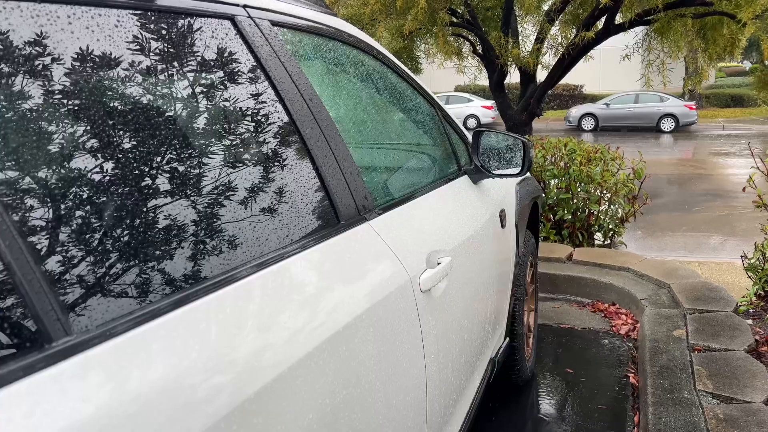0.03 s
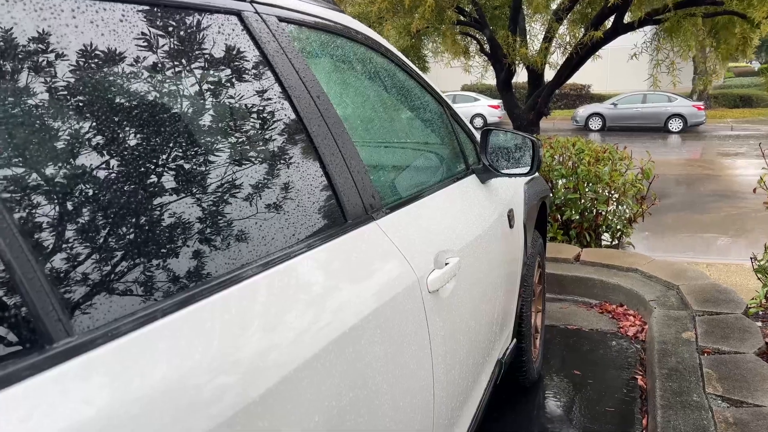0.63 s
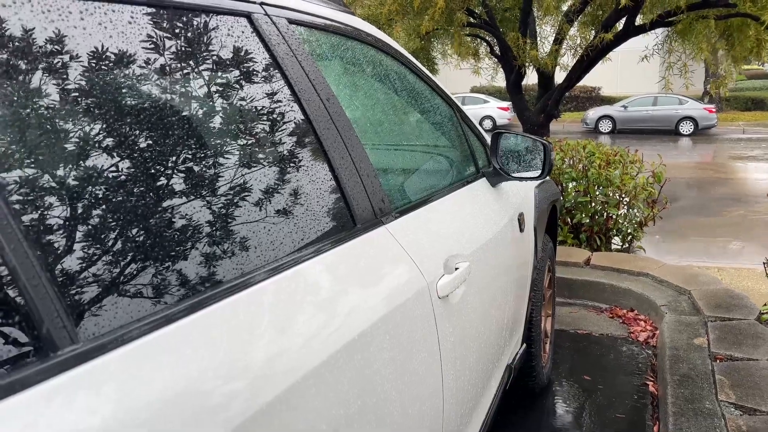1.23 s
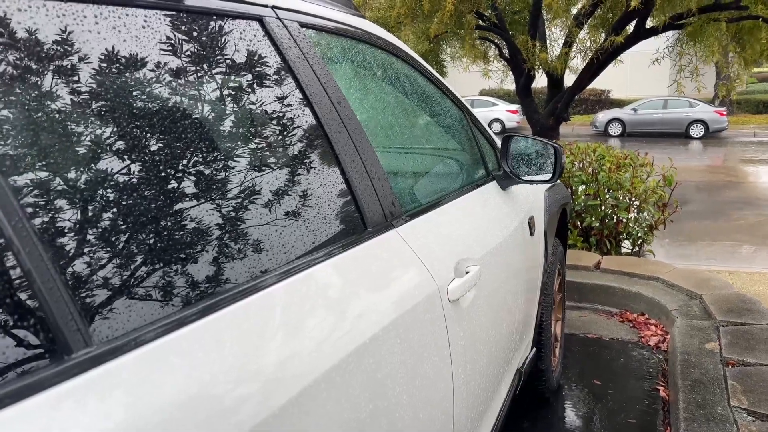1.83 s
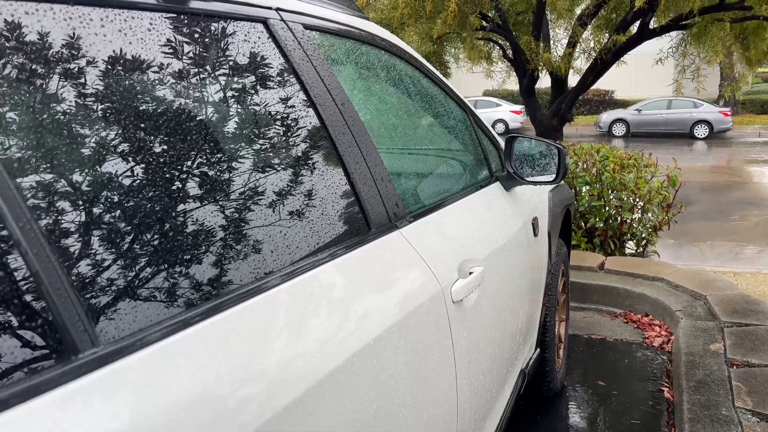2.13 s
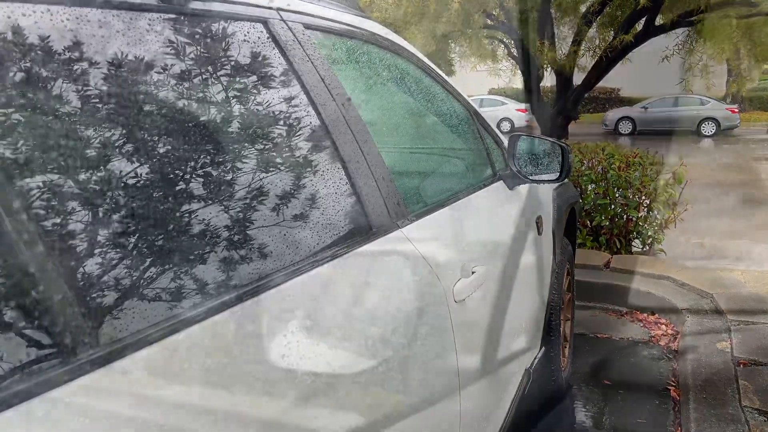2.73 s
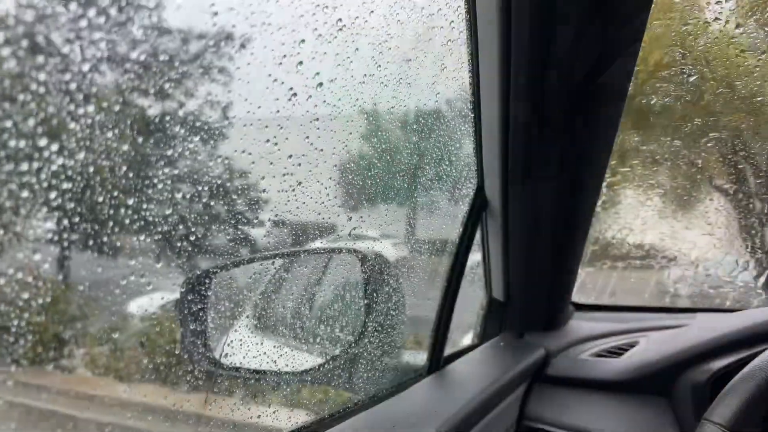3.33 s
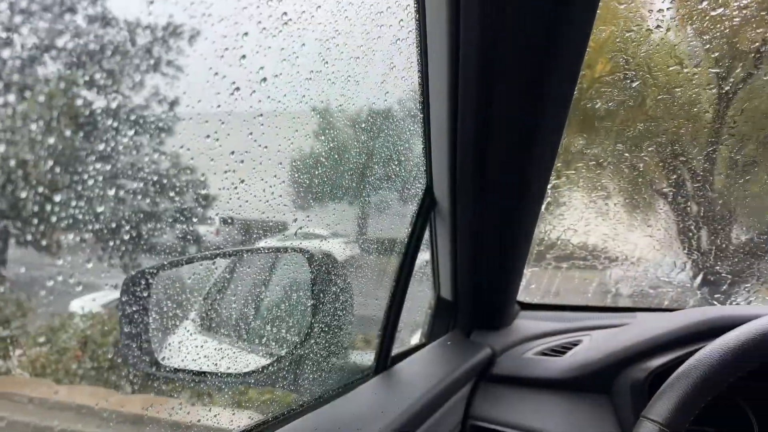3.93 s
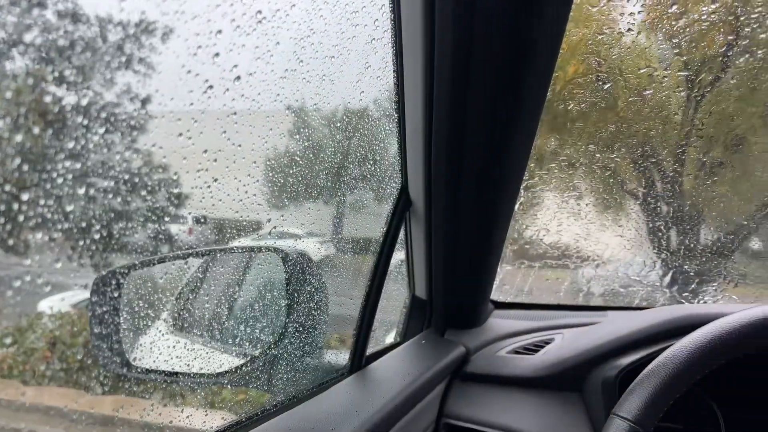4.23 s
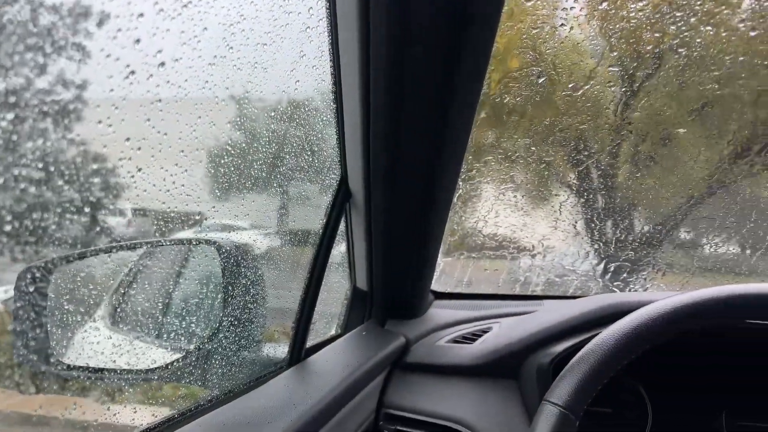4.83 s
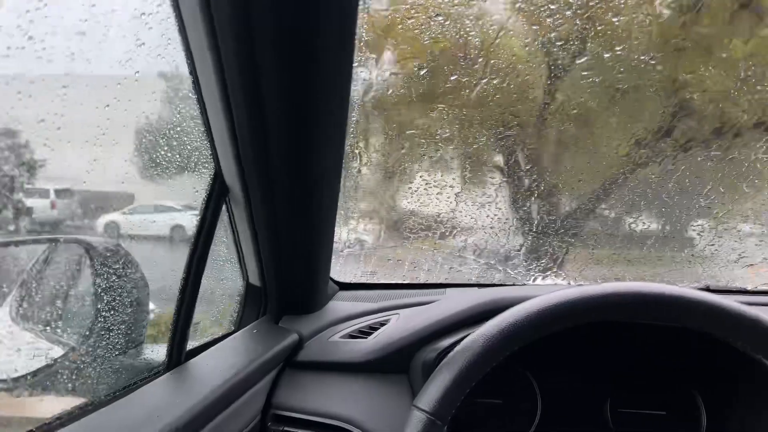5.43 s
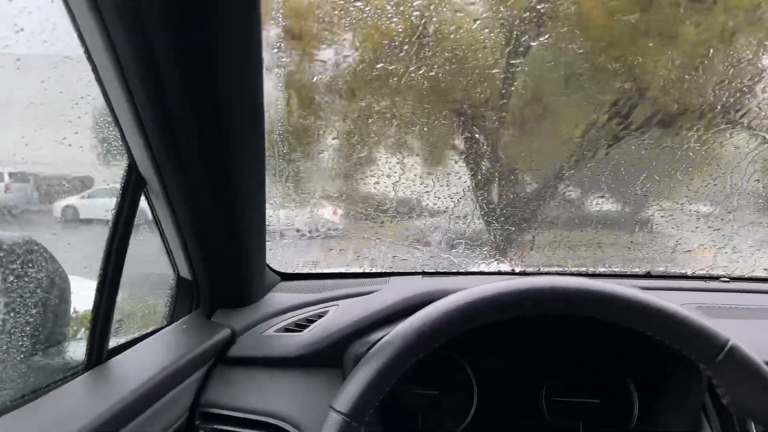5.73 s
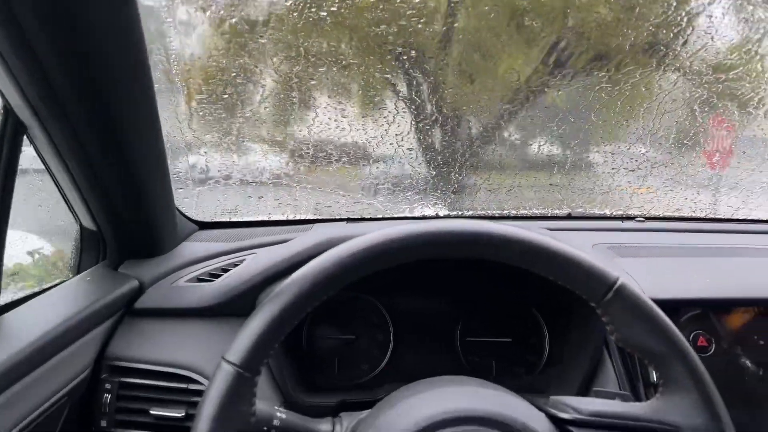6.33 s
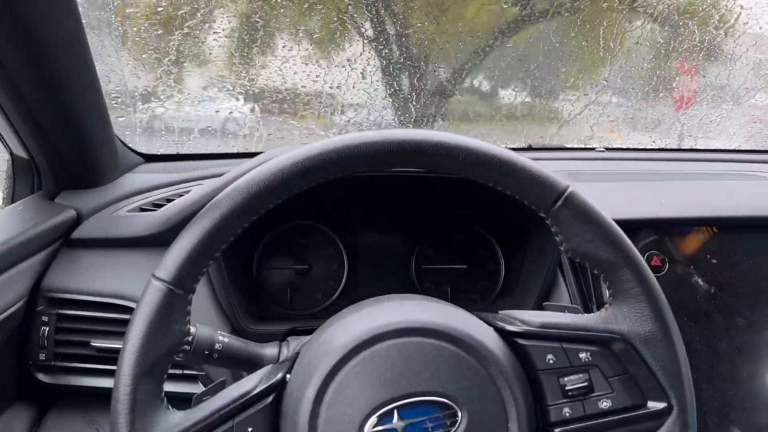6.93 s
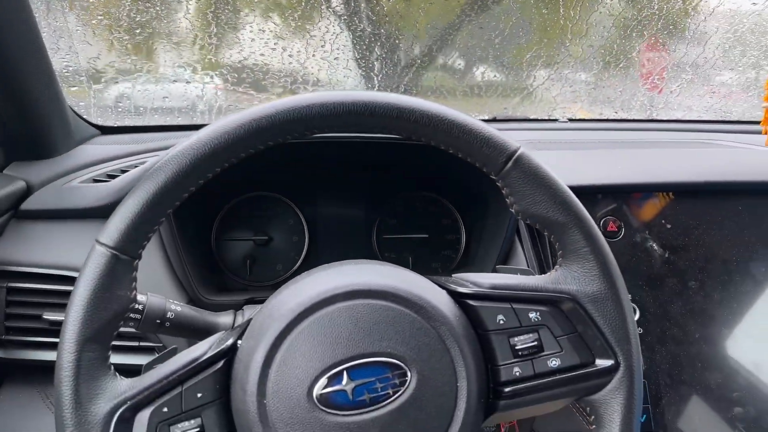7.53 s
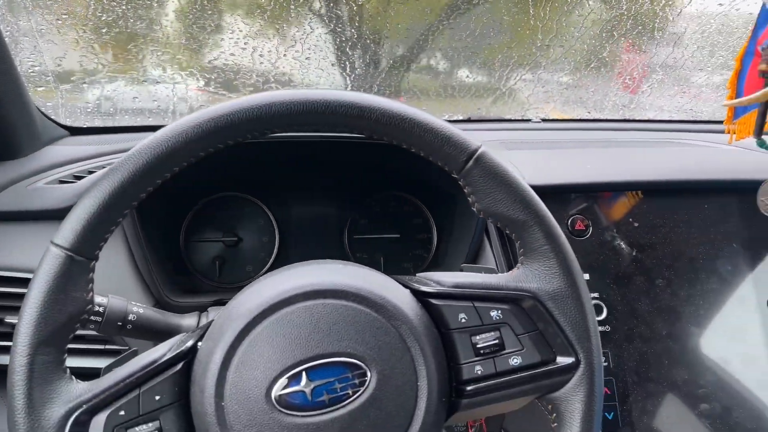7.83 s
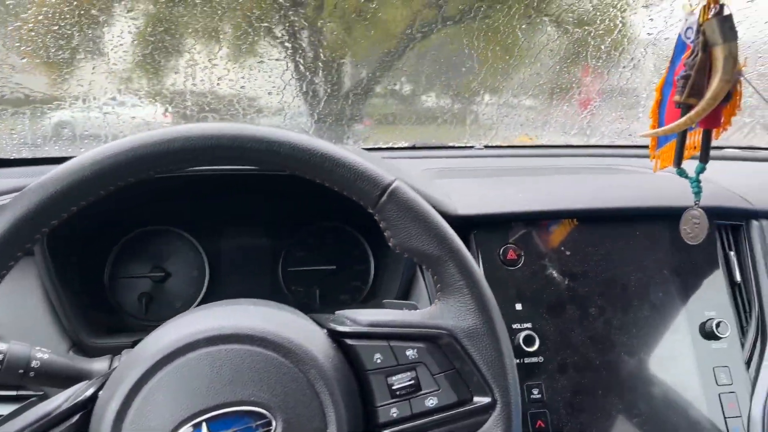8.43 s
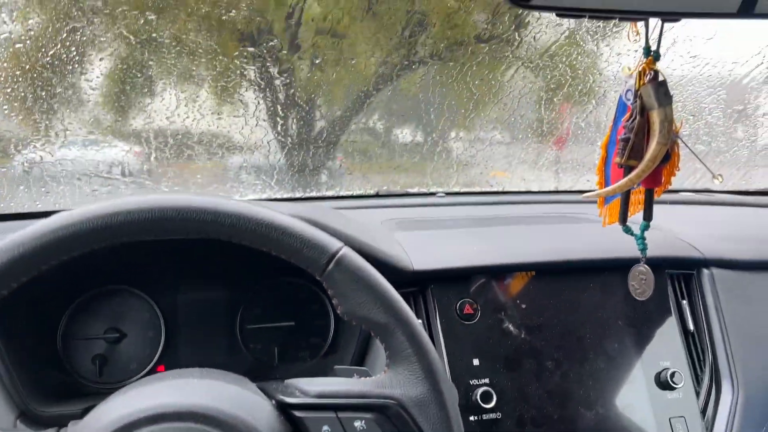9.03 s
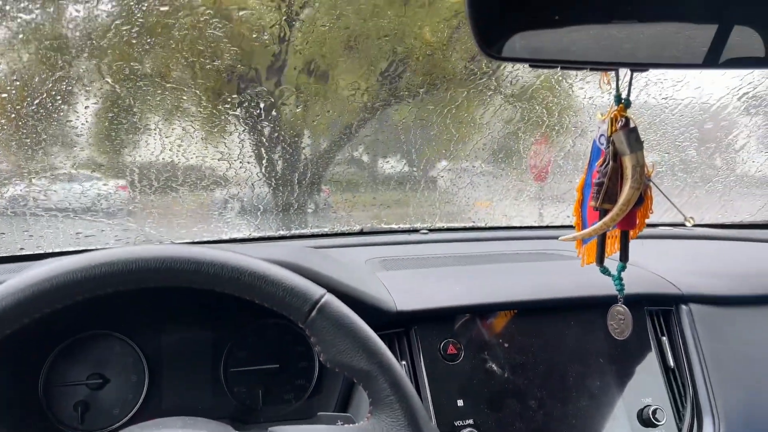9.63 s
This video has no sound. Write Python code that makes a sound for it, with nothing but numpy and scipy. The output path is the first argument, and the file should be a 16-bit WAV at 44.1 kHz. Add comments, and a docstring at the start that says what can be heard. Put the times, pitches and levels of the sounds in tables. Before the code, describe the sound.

Steady rain falls on wet pavement and leaves beside a parked car, an even wash with a few sharp drips close by and low thumps of wind on the microphone. After about three seconds the sound fades across to the inside of the closed car. There the rain is quieter and muffled: dull drumming on the roof, fine patter and sizzle on the glass, and scattered hollow taps of fat drops on the windscreen.

```python
"""Steady rain on a parked car, heard first from beside it, then, after a cross-fade, from the driver's seat.
Each impact excites the body: the roof drums, the glass patters and fat drops ring the windscreen's modes.
Gusts blow sizzling spray on the side window, and the microphone turns from there to the windscreen.
Outside, splashes on wet asphalt and leaves merge into a wash, bubbles ring in puddles and eddies
buffet the microphone. Hard drops tick close by, mostly in the open air."""
import sys
import numpy as np
from scipy import signal
from scipy.fft import rfft, irfft, next_fast_len
from scipy.io import wavfile

SR = 44100
rng = np.random.default_rng(int(sys.argv[2]) if len(sys.argv) > 2 else 0)


def to_wav(s):
    """Save 16-bit WAV."""
    ch = np.atleast_2d(s).T  # columns
    pcm = np.round(np.clip(ch, -1, 1) * 32767)  # PCM
    wavfile.write(sys.argv[1], SR, pcm.astype(np.int16))


N = 427329
TIME = np.arange(N) / SR
FFT_SIZE = next_fast_len(N)
BIN_HZ = np.maximum(np.arange(FFT_SIZE // 2 + 1) * SR / FFT_SIZE, 1)

# Stereo spectra. Each row: frequency in Hz, relative spectral density in dB,
# left-right likeness (1 is in phase, 0 unrelated), left minus right in dB.
WIND_SPECTRUM = [(15, -51, .8, -2), (28.3, -36, .8, 0), (44, -1.5, 0.97, -2), (86.5, 4, 0.91, 2),
                 (144, -6.5, 0.98, 4), (206, -10.5, 0.9, -3.5), (368, -18, 1, 3), (656, -85, 0.55, -5)]   # turbulence at the microphone
WASH_SPECTRUM = [(50, -42, 0.8, -1), (122, 2.5, 1.0, -2), (222, -1.5, 0.58, 7), (333, -1, 0.85, -4.5),
                 (590, -3.0, 0.45, 3.0), (745, -5.0, -0.19, 0), (1100, -7.0, 0.24, 2.5),
                 (1420, -9.0, -0.42, 0.5), (2000, -11.5, 0.00025, -1), (2050, -11, 0.53, 0),
                 (2960, -15.5, 0.37, -2), (4870, -21, 0.17, 5.5), (5630, -20.5, 0.19, 5.5),
                 (7400, -22.5, 0.26, 1), (8970, -21.5, 0.57, 0), (10330, -32.5, -2.47, -2),
                 (11400, -25, 0.74, 0.5), (13400, -43.5, -0.14, -2), (15600, -32.5, 0.09, 1)]   # rain in the open
SPRAY_SPECTRUM = [(1500, -18, 0, 0), (2700, -4, 0, 1), (3500, -1.3, .1, 1.3), (4400, -2.5, .2, 2),
                  (5400, -1.6, -.1, 6.8), (6500, .5, 0, 7.4), (7500, -3.3, .1, 3.5), (8700, -8.5, .2, -.5),
                  (10000, -20, 0, 0), (11600, -20.5, .4, 0), (13200, -33, .3, 0), (15800, -35, .3, 0)]   # fine spray on glass
BOOM_SPECTRUM = [(15, -42, 1, 7), (25, -20, 0.83, -4), (47.3, 5.5, 1, 1), (73.6, -1, 0.99, -0.5),
                 (148, 0, 0.97, 3), (184, -6, 1, 4), (302, -64, 0.11, -2)]   # the heavy body, from the seat
SIDE_SPECTRUM = [(115, -9.5, 0.99, -3), (202, 2.3, 0.88, 2.5), (296, -4.5, 0.55, 7.5), (352, 0, 0.73, 8.5),
                 (416, -2.5, 0.096, -1), (487, -5.5, -0.81, 7.5), (605, -10.5, -0.19, -2),
                 (696, -10, 0.27, -9.5), (870, -8, 1, 4), (1050, -6.5, 0.027, -2.5), (1300, -7, 0.0028, 5),
                 (1510, -6.5, -0.38, -2), (2000, -11, -0.13, 2), (2360, -13, 0.049, -1), (2520, -15, 0, -1),
                 (3060, -17, -0.1, 2), (4500, -22.5, 0.13, 0), (12000, -64, 0, 0)]   # the panels, facing the side window
FRONT_SPECTRUM = [(121, -17, 0.73, 6), (205, 0, 0.63, -0.5), (298, -2, 0.51, 0), (472, -4, 0.62, -2.5),
                  (553, -8, 0.28, -0.5), (725, -6.5, -0.058, 0), (1040, -7.5, 0.29, 0.5),
                  (1360, -6.5, 0.17, 1), (1520, -8, -0.18, -0.5), (2030, -10.5, -0.3, 1.5),
                  (2150, -12.5, 0.02, -2), (2880, -19.0, -0.23, 2.0), (4730, -28, 0.26, -1),
                  (12000, -78, 0, 0)]   # the panels, facing the windscreen

# Slow changes of strength. Each row: time in seconds, level in dB before offsets and the cross-fade.
BREEZE_LEVEL = [(0.0, -37), (0.9, -38), (1.42, -45), (1.6, -39), (2.3, -40), (2.8, -41), (3.3, -34.5)]   # wind on the microphone
GUST_LEVEL = [(3.3, -73.5), (3.85, -65.5), (4.05, -65.5), (4.38, -71.5), (4.92, -71), (5.04, -67),
              (5.61, -64.5), (5.73, -67.5), (6.28, -69.5), (6.42, -73), (6.62, -71), (6.81, -69),
              (7.38, -69), (7.77, -71.5), (8.19, -66.5), (9.12, -65), (9.39, -71.5), (9.69, -69.5)]   # spray blown against the glass
RAIN_LEVEL = [(3.3, -58.5), (3.8, -56), (3.93, -53.5), (4.06, -54.5), (4.2, -57.5), (5.46, -57.5),
              (5.97, -62.5), (6.51, -61.5), (6.81, -56.5), (7.53, -57.5), (7.68, -61), (8.31, -60),
              (9.15, -56.5), (9.69, -58.5)]   # how hard it rains on the car
ROOF_LEVEL = [(3.3, -62), (4.0, -57), (4.25, -60.5), (5.2, -60.5), (5.9, -66), (6.4, -66), (6.9, -63.5),
              (7.5, -62.5), (7.75, -67), (8.3, -66.5), (8.8, -62), (9.35, -59.5), (9.69, -60)]   # how hard the roof drums

# The passage from open air to cabin. Each row: time in seconds, outside gain, cabin gain.
CROSS_FADE = [(0, 0.94, 0.7), (2.45, 0.89, 0.25), (2.85, 0.46, 0.06), (3.35, 0.04, 0.95), (9.7, 0.03, 0.96)]
# Where the microphone faces. Each row: time in seconds, turn from 0 (side window) to 1 (windscreen).
FACING = [(0, 0.24), (5.2, 0.021), (6.2, 0.73), (9.7, 1)]
# Eddies at the microphone. Each row: centre in seconds, peak in dB before the cross-fade,
# pitch in Hz, length in cycles.
EDDIES = [(0.192, -29, 70, 1), (.345, -32, 115, 1.5), (.663, -23.5, 80, 1.9), (.708, -27, 270, 1),
          (.7315, -11.5, 110, .85), (2.385, -29, 105, 1.2), (2.545, -30, 185, 1.3), (2.56, -26, 95, .7),
          (2.609, -28.5, 140, 1.3), (2.652, -29, 170, 2), (2.732, -33, 150, 2.8), (2.897, -21, 70, 1.7),
          (2.975, -29.5, 105, 2.2), (3.12, -31, 70, 1.3), (3.175, -22, 150, .7), (3.232, -21, 175, .7)]
# Hard drops close by. Each row: start in seconds, peak in dB, pitch in Hz.
NEAR_DROPS = [(0.3, -48, 13000), (0.682, -41, 2200), (0.742, -49, 12000), (0.7905, -41, 5800),
              (0.798, -43, 2500), (1.026, -44, 2800), (1.198, -49, 12000), (1.42, -53, 12500),
              (1.993, -48, 10500), (2.286, -40, 2500), (2.3, -49, 12000), (2.518, -40, 2400),
              (2.537, -43, 2800), (3.027, -59, 13000), (5.124, -46, 8000), (8.301, -53, 7200),
              (8.363, -57, 7000), (9.564, -62, 7000)]
# Fat drops on the windscreen. Each row: start in seconds, peak in dB,
# brightness in dB per natural-log unit of frequency.
FAT_DROPS = [(3.385, -51, -1), (3.754, -50, 1), (3.984, -49.5, 0), (4.026, -49.5, 0), (4.309, -50, 3),
             (4.563, -51.5, 2), (4.612, -48, -3), (5.21, -50.5, -3), (5.886, -49.5, 0), (6.585, -47, -1),
             (6.783, -51, -3), (7.053, -48.5, 2), (7.447, -51, -1), (7.799, -48.5, 1), (8.877, -47, -2),
             (9.111, -46, -3), (9.405, -45, 1)]
# The windscreen's modes. Each row: frequency in Hz, bandwidth in Hz, relative level in dB.
PANE_MODES = [(380, 150, -4), (795, 175, 0.5), (1100, 150, -12), (1330, 140, -7.5), (1590, 130, -10),
              (1820, 140, -12), (2090, 140, -10.5), (2340, 150, -6.5)]

DROP_BAND_EDGES_HZ = [0, 650, 2600, 7000, 22050]   # drops of different sizes sound in different bands
WINDOW_PITCHES = [.88, .97, 1.02, 1.13]   # ratios to the windscreen's pitch: the panes differ in size


def from_db(db):
    """Amplitude grows tenfold for every 20 dB."""
    return 10 ** (np.asarray(db) / 20)


def unit_rms(x):
    """Normalisation brings a signal, or the mean of a stereo pair, to rms 1."""
    return x / (np.std(np.atleast_2d(x).mean(axis=0)) + 1e-20)


def in_time(rows):
    """Linear interpolation gives each column of a curve at every sample."""
    seconds, *columns = np.transpose(rows)
    return [np.interp(TIME, seconds, column) for column in columns]


def noise():
    """White noise, uncorrelated between the two channels."""
    return rng.standard_normal((2, N))


def landings(per_s):
    """Independent drops arrive as a Poisson process: true at each sample where one lands."""
    return rng.random(N) < per_s / SR


def cut(x, hz, kind):
    """A fourth-order low-pass or high-pass falls by 24 dB per octave."""
    return signal.sosfilt(signal.butter(4, hz, kind, fs=SR, output="sos"), x)


def resonance(x, hz, width_hz):
    """A damped oscillator with peak gain 1: the narrower its band, the longer it rings."""
    radius = np.exp(-np.pi * width_hz / SR)
    feedback = [1, -2 * radius * np.cos(2 * np.pi * hz / SR), radius ** 2]
    return signal.lfilter(np.array([1, 0, -1]) * (1 - radius ** 2) / 2, feedback, x + 1e-18)


def stereo_field(pair, spectrum):
    """Mixing two unrelated, coloured signals makes the channels partly coherent; the result has rms 1."""
    hz, *columns = np.transpose(spectrum)
    level_db, likeness, balance_db = [np.interp(np.log(BIN_HZ), np.log(hz), c) for c in columns]
    a, b = rfft(pair, FFT_SIZE) * from_db(level_db)
    blend = np.arcsin(np.clip(likeness, -.7, 1)) / 2
    left = (np.cos(blend) * a + np.sin(blend) * b) * from_db(balance_db / 2)
    right = (np.sin(blend) * a + np.cos(blend) * b) * from_db(-balance_db / 2)
    return unit_rms(irfft([left, right], FFT_SIZE)[:, :N])


def patter(per_s, spread_db, t60, pan_db=1.5, hop=16):
    """Random impacts, per_s in each band, are decaying bursts of noise whose energies add."""
    steps, step_s = N // hop + 1, hop / SR
    energy_decay = from_db(-60 * step_s / t60) ** 2
    white, out = rfft(noise(), FFT_SIZE), np.zeros((2, N))
    for low, high in zip(DROP_BAND_EDGES_HZ, DROP_BAND_EDGES_HZ[1:]):
        sizes_db = spread_db * np.minimum(rng.exponential(1, steps), 6)   # many small, few large
        place_db = pan_db * rng.uniform(-0.68, 1, steps) * np.array([[1], [-1]])
        drops = from_db(sizes_db + place_db) * (rng.random(steps) < per_s * step_s)
        energy = signal.lfilter([1], [1, -energy_decay], drops ** 2 + 1e-18)
        envelope = np.repeat(np.sqrt(energy / energy.mean()), hop, axis=1)[:, :N]
        band = irfft(white * ((BIN_HZ > low) & (BIN_HZ <= high)), FFT_SIZE)[:, :N]
        out += band * envelope
    return unit_rms(out)


def splash(t60):
    """One impact radiates noise that decays exponentially, by 60 dB in t60 seconds."""
    t = TIME[:SR // 10]
    return rng.standard_normal((2, len(t))) * from_db(-60 * t / t60)


def add(out, start_s, sound, peak_db):
    """Superposition: a sound joins the mix, the mean of its channels peaking at peak_db."""
    start = int(start_s * SR)
    part = sound[:, :N - start] / np.abs(sound.mean(axis=0)).max()
    out[:, start:start + part.shape[1]] += from_db(peak_db) * part


def wind(swell_db=-15, swell_s=0.026, lead_s=0.0085, sag_octaves_per_s=11):
    """Turbulence rumbles on the microphone, swelling as each eddy nears with its slowing pressure swings."""
    swells = sum(from_db(peak_db + swell_db) * np.exp(-((TIME - centre_s + lead_s) / swell_s) ** 2)
                 for centre_s, peak_db, _, _ in EDDIES)
    breeze = from_db(in_time(BREEZE_LEVEL)[0])
    out = (breeze + swells) * stereo_field(noise(), WIND_SPECTRUM)
    t = TIME[:SR // 5] - .1   # seconds from the eddy's centre
    for centre_s, peak_db, hz, length in EDDIES:
        cycles = np.cumsum(hz * 2 ** (-sag_octaves_per_s * t)) / SR
        cycles -= cycles[len(t) // 2]
        phase = rng.uniform(0, 2 * np.pi) + np.array([[.15], [-.15]])   # the eddy reaches one port first
        swing = np.sin(2 * np.pi * cycles + phase) / np.cosh(np.sqrt(2) * cycles / length)
        add(out, centre_s + t[0], swing * from_db([[.3], [-.3]]), peak_db)
    return out


def puddle_bubbles(low_hz=1900, high_hz=3600, count=20, width_share=.03):
    """Air trapped by a drop resonates as a small bubble, each ringing briefly at its own pitch."""
    pitches = np.geomspace(low_hz, high_hz, count)
    drops = landings(per_s=520) * noise()
    pitch_index = rng.integers(0, count, N)
    rings = sum(resonance(drops * (pitch_index == k), hz, width_share * hz)
                for k, hz in enumerate(pitches))
    return from_db(-61.5) * unit_rms(rings)


def open_rain():
    """Countless far splashes add incoherently into a wash; the near ones stand out as grain."""
    splashes = noise() + from_db(-3.5) * patter(per_s=900, spread_db=2.0, t60=0.033)
    return from_db(-44) * stereo_field(splashes, WASH_SPECTRUM)


def near_ticks(width_share=.45, top_ratio=1.2):
    """A brief impact has a broad spectrum: a hard drop ticks, and the finest spatters sound highest."""
    out = np.zeros((2, N))
    for start_s, peak_db, hz in NEAR_DROPS:
        width_hz = width_share * hz
        tick = resonance(resonance(splash(t60=0.008), hz, width_hz), hz, width_hz)
        add(out, start_s, cut(tick, top_ratio * hz, "low"), peak_db)
    return out * from_db([[1.5], [-1.5]])


def spray(level_db, treble_hz=12400):
    """Dense, tiny impacts sizzle on the glass among coarser spatters; stronger gusts sound brighter."""
    spatters = from_db(-13) * patter(per_s=45, spread_db=1.5, t60=0.025)
    droplets = patter(per_s=1700, spread_db=2.0, t60=0.04)
    sizzle = stereo_field(droplets + spatters, SPRAY_SPECTRUM)
    treble = irfft(rfft(sizzle, FFT_SIZE) / (1 + (treble_hz / BIN_HZ) ** 8), FFT_SIZE)[:, :N]
    treble_gain = from_db(level_db - np.median(level_db))
    return from_db(level_db) * (sizzle + (treble_gain - 1) * treble)


def pane(strike, tilt_db=0, pitch=1, spread_db=1.2, top_hz=2700):
    """Struck glass sounds as a sum of damped modes, tilted bright or dull and varied at random."""
    lowest_hz, ring = PANE_MODES[0][0], 0
    for k, (hz, width_hz, level_db) in enumerate(PANE_MODES):
        # two resonances in series swell and die within milliseconds
        mode = resonance(resonance(strike(), pitch * hz, width_hz), pitch * hz, width_hz)
        strength_db = level_db + tilt_db * np.log(hz / lowest_hz) + rng.normal(0, spread_db)
        ring = ring + (-1) ** k * from_db(strength_db) * mode
    return cut(ring, top_hz, "low")


def window_drops(per_s=85):
    """Larger drops land softly on all the windows, each impulse exciting its own mix of modes."""
    out = 0
    for pitch in WINDOW_PITCHES:
        samples = np.flatnonzero(landings(per_s / len(WINDOW_PITCHES)))

        def strike():
            """An impulse of random strength for every landing, in each channel."""
            hits = np.zeros((2, N))
            hits[:, samples] = rng.standard_normal((2, len(samples)))
            return hits
        out = out + pane(strike, pitch=pitch)
    return unit_rms(out)


def windscreen_taps():
    """A fat drop's impulse gives a hollow tock, then the water spreads; each tock has its own brightness."""
    out = np.zeros((2, N))
    for start_s, peak_db, brightness_db in FAT_DROPS:
        hit = signal.unit_impulse(SR // 10) + from_db(-23) * splash(t60=.085)
        pitch = rng.normal(1, .022)   # varies with the spot that is struck
        add(out, start_s, pane(lambda: hit, brightness_db, pitch), peak_db)
    return out


def body_boom(rain_db, swing_share=0.24):
    """The heavy body responds at low frequencies, following only a share of the rainfall's swing."""
    swing_db = rain_db - np.median(rain_db)
    return from_db(-57 + swing_share * swing_db) * stereo_field(noise(), BOOM_SPECTRUM)


def panel_patter():
    """The cabin filters the impacts; an equal-power blend shifts their colour as the microphone turns."""
    turn = in_time(FACING)[0] * np.pi / 2
    side, front = [stereo_field(patter(per_s=1300, spread_db=2.5, t60=0.17), spectrum)
                   for spectrum in (SIDE_SPECTRUM, FRONT_SPECTRUM)]
    return np.cos(turn) * side + np.sin(turn) * front


def rain_on_car(crossover_hz=620):
    """Panels driven by impacts radiate sound: the lined roof drums dully and the glass patters above it."""
    rain_db, gust_db, roof_db = in_time(RAIN_LEVEL) + in_time(GUST_LEVEL) + in_time(ROOF_LEVEL)
    panels = panel_patter()
    roof = from_db(roof_db) * unit_rms(cut(panels, crossover_hz, "low"))
    glass = from_db(rain_db - 6.5) * unit_rms(cut(panels, crossover_hz, "high"))
    larger_drops = from_db(rain_db - 13) * window_drops()
    return body_boom(rain_db) + roof + glass + larger_drops + spray(gust_db - 4)


def scene():
    """The sources add linearly: open air cross-fades into the cabin, while taps and ticks bypass the fade."""
    outside_gain, cabin_gain = in_time(CROSS_FADE)
    outside = open_rain() + puddle_bubbles() + wind()
    return outside_gain * outside + cabin_gain * rain_on_car() + windscreen_taps() + near_ticks()


def record(dry):
    """A steep elliptic low-pass limits the bandwidth to 15.8 kHz."""
    return signal.sosfilt(signal.ellip(10, .1, 80, 15800, fs=SR, output="sos"), dry)


dry = scene()
out = record(dry)
to_wav(out)
```